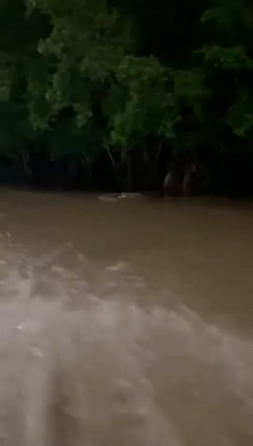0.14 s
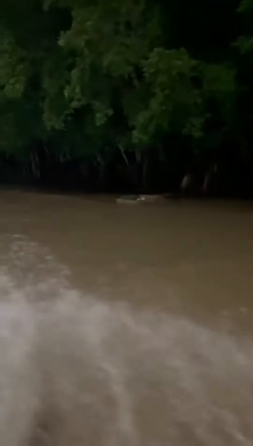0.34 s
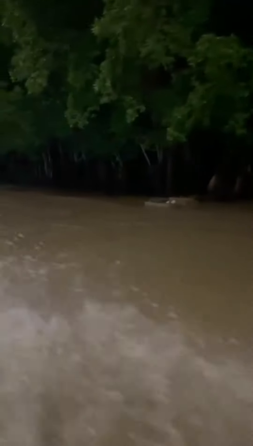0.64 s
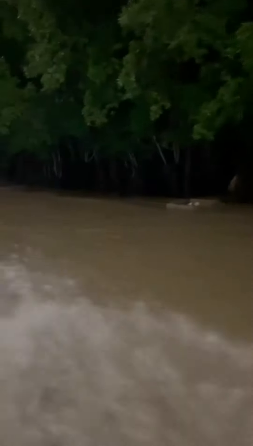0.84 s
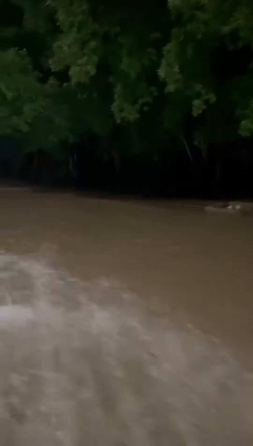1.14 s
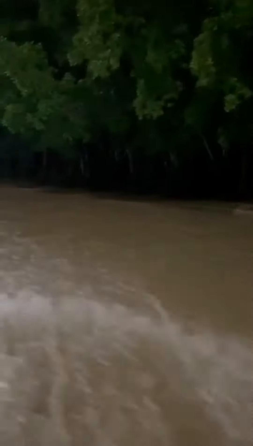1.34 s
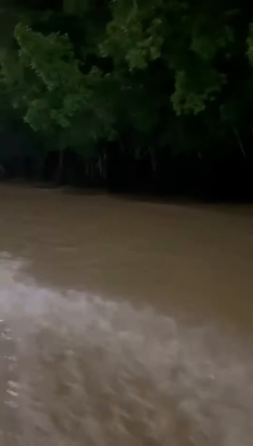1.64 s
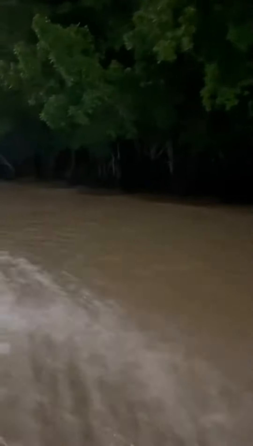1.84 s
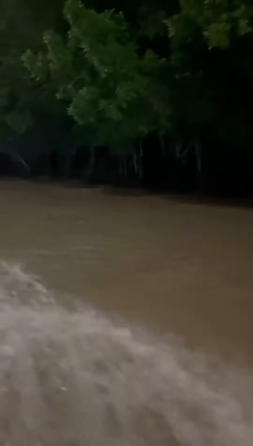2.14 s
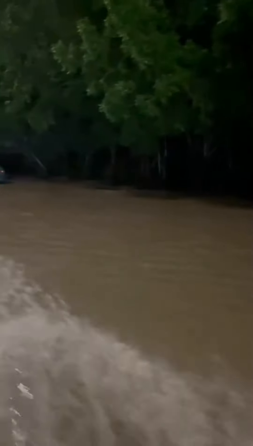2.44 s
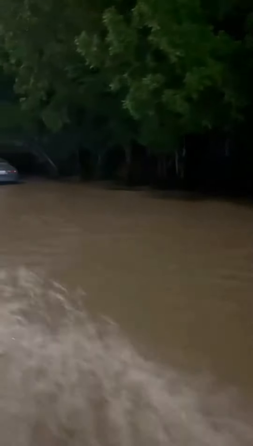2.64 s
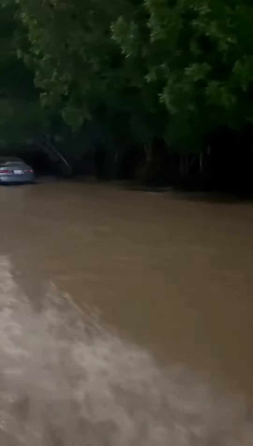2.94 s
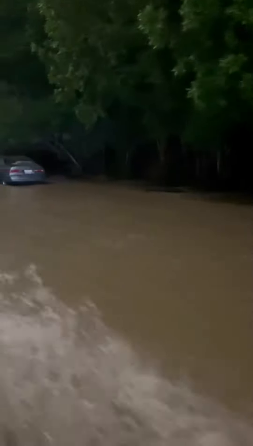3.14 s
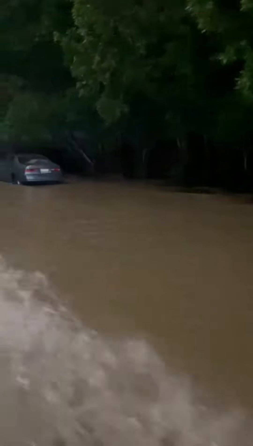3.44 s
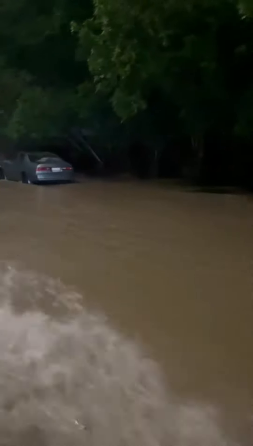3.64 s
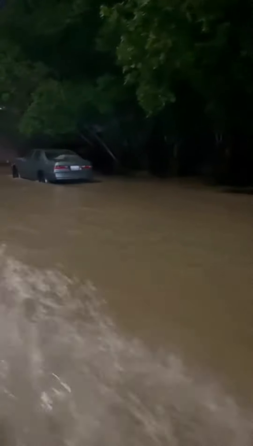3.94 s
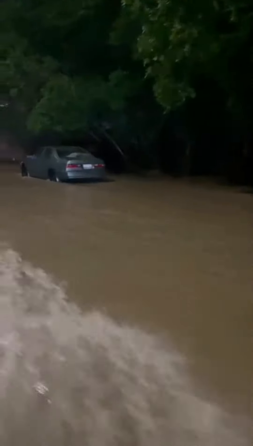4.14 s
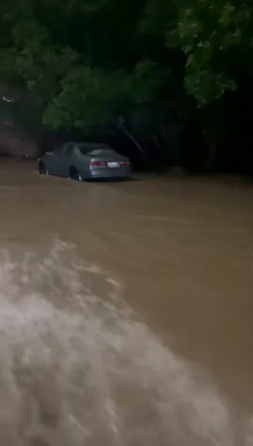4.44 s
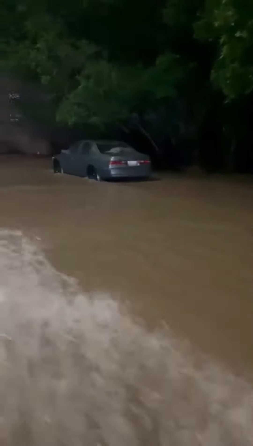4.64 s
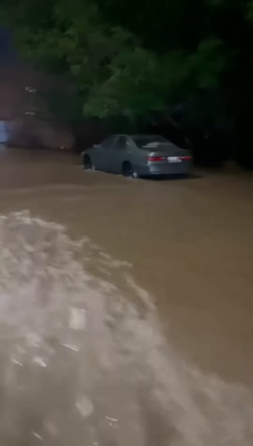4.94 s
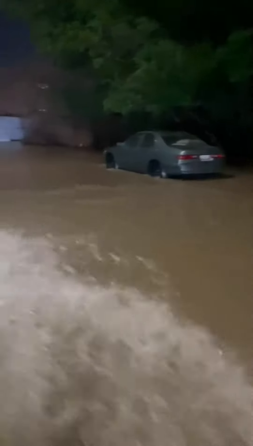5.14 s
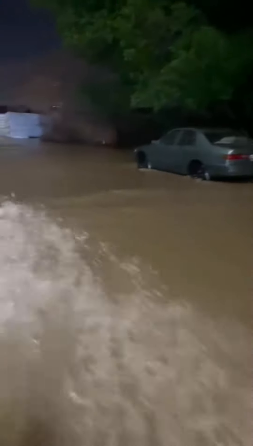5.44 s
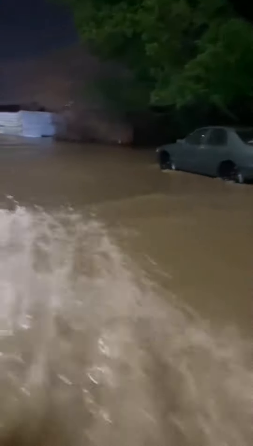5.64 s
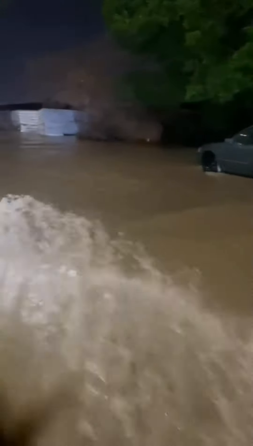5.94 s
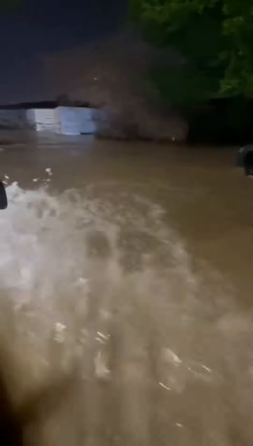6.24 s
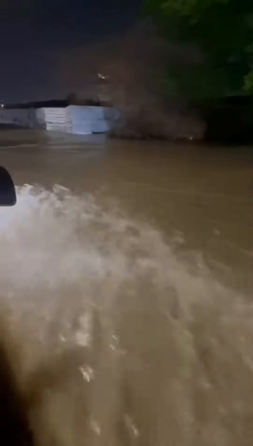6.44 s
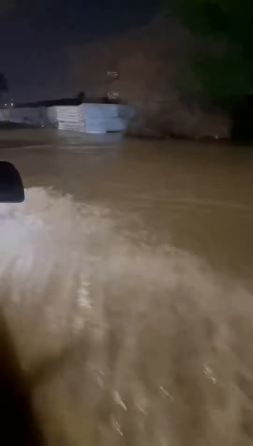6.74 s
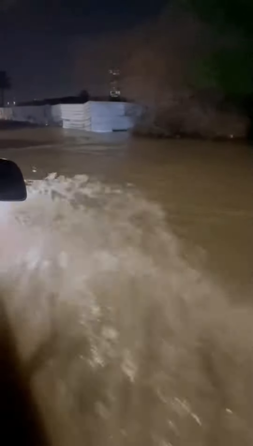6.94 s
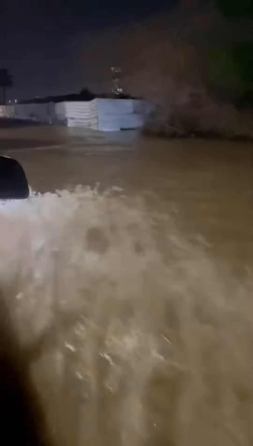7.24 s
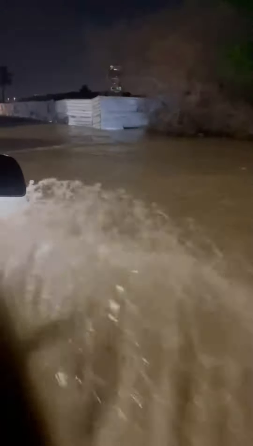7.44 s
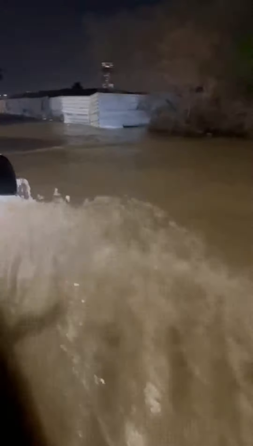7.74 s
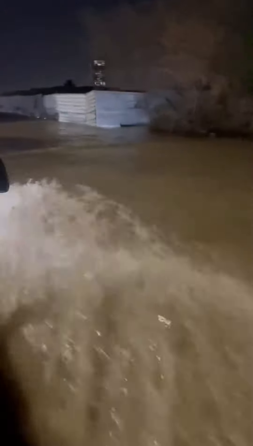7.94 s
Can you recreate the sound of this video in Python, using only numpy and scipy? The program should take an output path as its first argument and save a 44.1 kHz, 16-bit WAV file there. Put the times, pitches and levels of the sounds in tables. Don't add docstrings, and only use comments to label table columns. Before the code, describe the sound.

About eight seconds from the open window of a car pushing through deep floodwater outdoors at night. A low, lumpy eight-cylinder exhaust throb swells in at once, slows slightly around 1 second, recovers by 2.4 and pulls steadily to the end. A very faint gear whine enters near 1.7, sinks slightly and fades after 4. Over it, a wide, close bow wave rushes continuously, hissing and fizzing with drops, a little fuller around 5 and 7; it slaps the body at the start, at 3.4, and lightly at 4.3 and 7.7. Short hollow bubbles plop at 0.8, 2.5, 3.3, 4.4, 5.7 and, higher, 7.5. Wind rumbles low on a small stereo microphone, with clustered soft thumps in the first second, strong bumps at 1.9 and 6.7, and several more from 7 to 7.9. The treble is slightly patchy, like compressed phone audio.

```python
import sys
import numpy as np
from scipy import signal
from scipy.fft import rfft, irfft, next_fast_len
from scipy.io import wavfile
from scipy.ndimage import uniform_filter1d

SR = 44100
rng = np.random.default_rng(int(sys.argv[2]) if len(sys.argv) > 2 else 0)


def inscribe(sig):
    pcm = np.round(np.clip(np.atleast_2d(sig).T, -1, 1) * 32767)
    wavfile.write(sys.argv[1], SR, pcm.astype(np.int16))


def amplitude_ratio(level_db):
    exponent = np.asarray(level_db, float) / 20
    return 10 ** exponent


N = 356769
TIME = np.arange(N) / SR

# start_s, cycles_per_s, exhaust_level_db
ENGINE_PACE = [(0, 9.577, -26.9), (.3, 9.684, -22.6), (.75, 9.391, -20.1), (.95, 9.237, -22.7),
               (1.7, 9.279, -20.1), (2.4, 9.879, -17.2), (3.7, 9.875, -18.1), (4.6, 9.883, -17.9),
               (5.3, 9.864, -17.6), (6.2, 9.932, -18.8), (6.8, 9.91, -18.8), (7.5, 9.99, -17.4),
               (8.1, 9.926, -19.7)]
# place_in_cycle (0-1), strength_db
CYLINDERS = [(-0.09, -2.3), (0.013, -17.8), (0.181, -6.3), (0.288, -5.4), (0.419, -8.1), (0.541, -5.4),
             (0.691, -16.1), (0.798, -1.3)]
# pitch_hz, width_hz, signed_share
EXHAUST_RESONANCES = [(58.7, 14.7, -0.791), (99.7, 30.0, 1.0), (165.2, 52.1, 0.116)]
# start_s, pitch_hz, level_db
GEAR_WHINE = [
    (1.4, 342, -60),
    (1.75, 341, -41),
    (2.6, 336.5, -41),
    (4.1, 333, -42),
    (4.4, 332.5, -48),
    (8.09, 331, -50),
]
# start_s, rush_level_db, extra_spray_db
BOW_WAVE = [(0, -28, 0.5), (.4, -27, 1), (1.5, -27.5, 1), (1.85, -27, -1.5), (3.0, -27, 0.5),
            (4.85, -26.5, 0.5), (5.05, -25.5, 0), (6.3, -27, 1.5), (7.0, -25.5, 0), (8.09, -26.5, 0.5)]
# peak_s, level_db over the rush
BODY_SLAPS = [
    (0.0, 3.5),
    (.79, -0.5),
    (3.38, 3.5),
    (4.26, 1),
    (5.0, -1),
    (6.56, 0),
    (7.41, 0),
    (7.68, 2),
]
# pitch_hz, level_db per Hz
SHARED_WATER = [(120, -22), (200, 3.5), (300, 3.5), (600, -1), (2700, -2), (3700, -7), (4400, -8),
                (4900, -10), (5300, -5.5), (6200, -5.5), (7500, -9), (8200, -13.5), (9000, -19.5),
                (12500, -18)]
# pitch_hz, level_db per Hz
OPPOSED_WATER = [(120, -32), (250, -4), (800, -6), (1300, -10), (1750, -15), (2300, -6), (3500, -9),
                 (4050, -7), (4800, -6), (5800, -11.5), (6900, -10), (8500, -3), (11400, -6),
                 (12100, -25.5)]
# pitch_hz, in_step (-1 to 1), quarter_turn_ahead (-1 to 1)
PORT_TIE = [(200, -0.61, -.15), (600, -0.86, -.26), (900, -0.72, .02), (1900, -0.49, 0.39),
            (2800, -0.064, 0.7), (4100, -0.095, .22), (5300, 0.0062, -0.18), (7160, .02, 0.018),
            (8600, 0.053, 0.19)]
# start_s, level_db (rms), pitch_hz, length_s
BUBBLES = [
    (0.789, -25, 792, 0.027),
    (2.54, -33, 724, 0.028),
    (3.225, -32, 987, .025),
    (3.374, -29, 652, 0.026),
    (4.415, -28.5, 733, 0.03),
    (5.735, -24.5, 726, 0.016),
    (7.527, -24, 1096, 0.015),
    (8.016, -30, 800, 0.02),
]
# peak_s, level_db, top_pitch_hz, length_s
PUFFS = [(0.031, -29, 221, 0.026), (0.206, -21.5, 200, 0.036), (0.318, -24, 217, 0.035),
         (.45, -21.5, 297, 0.03), (0.559, -21, 260, 0.0272), (0.761, -16.5, 250, .016),
         (0.789, -13, 249, 0.014), (.827, -17, 130, .03), (0.884, -25, 283, 0.018), (0.957, -22, 252, .03),
         (1.014, -14, 206, 0.02), (1.33, -23, 178, 0.031), (1.943, -11.5, 148, 0.027),
         (2.438, -24, 200, 0.029), (2.912, -19.5, 338, .025), (3.02, -25.5, 318, 0.023),
         (3.14, -21.5, 214, 0.045), (4.833, -21, 244, .03), (6.555, -23.5, 207, 0.036),
         (6.704, -11, 170, 0.015), (7.004, -26, 150, 0.033), (7.105, -16, 130, 0.035),
         (7.629, -17, 288, 0.021), (7.677, -20, 130, .03), (7.736, -16, 180, .03),
         (7.898, -15.5, 158, 0.015)]
# peak_s, peak_level_db
GUSTS = [(.04, -27), (.34, -35), (.47, -33), (.97, -27), (1.35, -26), (2.46, -23), (2.84, -27.5),
         (3.51, -30), (3.72, -30), (4.35, -25.5), (4.87, -26), (5.38, -27.5), (5.931, -32), (6.15, -33),
         (6.56, -35), (7.07, -26), (7.61, -22.5)]
# pitch_hz, level_db per Hz
WIND_COLOUR = [(15, -26.5), (28, -9), (45, -9), (62, 2), (95, -2), (140, -5), (220, -10.5), (400, -23.5),
               (800, -36)]
# centre_s, low_hz, high_hz
TREBLE_GLINTS = [
    (.37, 8000, 9200),
    (1.83, 10900, 11800),
    (2.83, 8000, 10500),
    (4.165, 10900, 11700),
    (5.235, 10900, 11700),
    (5.49, 10800, 11800),
]


def evened(x):
    return x / np.sqrt(np.mean(np.abs(x) ** 2) + 1e-20)


def read(points, hz):
    f, value = np.transpose(points)
    return np.interp(np.log(hz + 1), np.log(f + 1), value)


def coloured(x, points):
    size = next_fast_len(x.shape[-1])
    gain = amplitude_ratio(read(points, np.fft.rfftfreq(size, 1 / SR)))
    return irfft(rfft(x, size) * gain, size)[..., :x.shape[-1]]


def add(mix, start_s, sound):
    part = mix[..., round(start_s * SR):][..., :sound.shape[-1]]
    part += sound[..., :part.shape[-1]]


def swells(at, start_s, rise_s, fall_s):
    lag = at - np.asarray(start_s)[:, None]
    return np.exp(np.where(lag < 0, lag / rise_s, -lag / fall_s))


def highpassed(x, hz):
    return signal.sosfilt(signal.butter(2, hz, "high", fs=SR, output="sos"), x)


def on_ports(common, apart, split_hz=130, apart_db=-3.5):
    apart = highpassed(apart, split_hz) * amplitude_ratio(apart_db)
    return np.array([common + apart, common - apart]) * amplitude_ratio([[-.8], [.8]])


def exhaust(uneven_db=0.55, overtone_db=1.5, start_cycle=.032):
    s, per_s, level_db = np.transpose(ENGINE_PACE)
    cycles = start_cycle + np.cumsum(np.interp(TIME, s, per_s)) / SR
    place, strength_db = np.transpose(CYLINDERS)
    fired = np.arange(-1, 81)[:, None] + place
    at = np.interp(fired, cycles, TIME, left=-1, right=9) * SR
    size = amplitude_ratio(strength_db + uneven_db * rng.standard_normal(fired.shape))
    inside = (at >= 0) & (at < N - 1)
    pulses = np.bincount(at[inside].astype(int), size[inside], next_fast_len(N + SR))
    hz = np.fft.rfftfreq(len(pulses), 1 / SR)
    pipe = 0
    for f, width, share in EXHAUST_RESONANCES:
        band = 1j * hz * width / (f * f - hz * hz + 1j * hz * width)
        pipe = pipe + share * band ** 2
    pipe = pipe * amplitude_ratio(overtone_db * (hz > 160))
    throb = evened(irfft(rfft(pulses) * pipe, len(pulses))[:N])
    return throb * amplitude_ratio(np.interp(TIME, s, level_db))


def gear_whine():
    s, pitch_hz, level_db = np.transpose(GEAR_WHINE)
    turns = np.cumsum(np.interp(TIME, s, pitch_hz)) / SR
    return amplitude_ratio(np.interp(TIME, s, level_db)) * np.sin(2 * np.pi * turns)


def engine():
    return (exhaust() + gear_whine()) * amplitude_ratio([[-.6], [.6]])


def drops(per_s=2500, spread_db=3.0):
    out = np.zeros(N)
    for hz in np.geomspace(300, 11000, num=24):
        t = np.arange(int(5 * SR / hz)) / SR
        tone = np.sin(2 * np.pi * hz * t * (1 + .04 * hz * t))
        grain = tone * np.hanning(len(t)) * np.sqrt(hz) / np.sqrt(len(t))
        landed = rng.random(N) < per_s / 24 / SR
        train = landed * amplitude_ratio(spread_db * np.minimum(rng.exponential(1, N), 5))
        out += signal.oaconvolve(train, grain)[:N]
    return evened(out)


def water(drop_share=0.29, patchy_db=1.0, flicker_db=0.67, side_trim_db=-2.2):
    spray = drops()
    raw = rng.standard_normal((2, N)) + drop_share * np.array([spray, np.roll(spray, N // 2)])
    hz, t, (a, b) = signal.stft(raw, SR, nperseg=512, noverlap=384)
    high = np.clip((hz[:, None] - 2800) / 1200, 0, 1)

    s, rush_db, spray_db = np.transpose(BOW_WAVE)
    wave_db = np.interp(t, s, rush_db) + high * np.interp(t, s, spray_db)
    slap_s, slap_db = np.transpose(BODY_SLAPS)
    slaps_db = slap_db @ swells(t, slap_s, rise_s=0.023, fall_s=0.018)
    slaps_db = slaps_db * (0.5 + 0.5 * high)
    patches = uniform_filter1d(rng.standard_normal(a.shape), size=8, axis=0)
    patches = evened(uniform_filter1d(patches, size=14, axis=1))
    flicker = evened(uniform_filter1d(rng.standard_normal(len(t)), size=8))
    field = amplitude_ratio(wave_db + slaps_db + patchy_db * patches + flicker_db * flicker)

    at_hz, in_step, ahead = np.transpose(PORT_TIE)
    tie = np.interp(hz, at_hz, in_step + 1j * ahead)[:, None]
    mid = amplitude_ratio(read(SHARED_WATER, hz))[:, None] * a
    loose = np.sqrt(np.maximum(1 - abs(tie) ** 2, 0)) * b
    side = amplitude_ratio(read(OPPOSED_WATER, hz))[:, None] * (tie * a + loose)
    side = side * amplitude_ratio(high * (hz[:, None] < 5200) * side_trim_db)

    body = mid[(hz > 500) & (hz < 3000)]
    scale = 1 / np.sqrt(np.mean(np.sum(abs(body) ** 2, axis=0)) * 4 / 3)
    ports = np.array([mid + side, mid - side]) * field * scale
    return signal.istft(ports, SR, nperseg=512, noverlap=384)[1][:, :N]


def bubbles():
    out = np.zeros(N)
    for s, db, hz, length in BUBBLES:
        u = np.arange(0, length, 1 / SR) / length
        turns = 2 * np.pi * hz * length * (1.05 * u - 0.051 * u ** 2)
        ring = np.sin(turns) + .5 * np.sin(0.92 * turns)
        add(out, s, amplitude_ratio(db) * 4 * np.sqrt(u) * (1 - u) * ring)
    return out * amplitude_ratio([[-2.0], [2.0]])


def thumps(rough=0.3, floor_hz=55, pan_db=-0.5):
    out = np.zeros((2, N))
    pan = amplitude_ratio([[pan_db / 2], [-pan_db / 2]])
    for s, db, hz, length in PUFFS:
        u = np.arange(0, length, 1 / SR) / length
        push = -np.sin(2 * np.pi * hz * length * (0.91 * u - 0.35 * u ** 2))
        lowpass = signal.butter(2, 1.1 * hz, fs=SR, output="sos")
        air = signal.sosfilt(lowpass, rng.standard_normal((2, len(u))))
        common, apart = rough * evened(air)
        puff = on_ports(push + common, apart) * np.sqrt(u) * (1 - u) * 2.7
        add(out, s - length / 3, amplitude_ratio(db) * puff * pan)
    return highpassed(out, floor_hz)


def wind(breeze_db=-31.5, lumpy_db=0.2, over_db=2.5):
    common, apart, lumps = rng.standard_normal((3, N))
    air = evened(coloured(on_ports(common, apart), WIND_COLOUR))
    lumps = evened(uniform_filter1d(uniform_filter1d(lumps, size=900), size=900))
    s, db = np.transpose(GUSTS)
    push = amplitude_ratio(breeze_db) + amplitude_ratio(db) @ swells(TIME, s, rise_s=0.028, fall_s=0.039)
    return air * push * amplitude_ratio(over_db + lumpy_db * lumps)


def scene():
    return engine() + water() + bubbles() + thumps() + wind()


def thinned(x, under_db=-10.0, tighter_db=1.5, wander_db=2.5, from_hz=1000,
            shared_top_hz=9100, glint_db=8.0, apart_db=2.0):
    lead = np.zeros((2, 509))
    pair = np.hstack([lead, [x[0] + x[1], x[0] - x[1]]]) / 2
    hz, t, z = signal.stft(pair, SR, window="cosine", nperseg=2048, noverlap=1024)
    near = uniform_filter1d(abs(z) ** 2, size=4, axis=1)
    near[1] = uniform_filter1d(near[1], size=20, axis=0)
    both = uniform_filter1d(near.sum(0), size=40, axis=0)

    wander = np.repeat(rng.standard_normal((len(hz) // 16 + 1, len(t))), 16, axis=0)[:len(hz)]
    octaves = np.log2(np.maximum(hz, from_hz) / from_hz)[:, None]
    limit_db = under_db + tighter_db * octaves + wander_db * wander * (1 + (octaves > 3))
    extra_db = np.array([0, apart_db])[:, None, None] * (octaves > 2)
    limit = both * amplitude_ratio(2 * limit_db) * amplitude_ratio(2 * extra_db)
    keep = ((near > limit) | (hz[:, None] < from_hz)) * 1.0
    keep[0, hz > shared_top_hz] = 0
    for s, low_hz, high_hz in TREBLE_GLINTS:
        frame = np.argmin(abs(t - lead.shape[1] / SR - s))
        keep[0, (hz > low_hz) & (hz < high_hz), frame] = amplitude_ratio(glint_db * (low_hz < shared_top_hz))
    back = signal.istft(z * keep, SR, window="cosine", nperseg=2048, noverlap=1024)[1]
    mid, side = back[:, lead.shape[1]:][:, :N]
    return np.array([mid + side, mid - side])


def band_limit(x):
    return signal.sosfilt(signal.butter(12, 11950, fs=SR, output="sos"), x)


def record(dry):
    mix = thinned(np.tanh(dry))
    return band_limit(mix)


dry = scene()
out = record(dry)
inscribe(out)
```